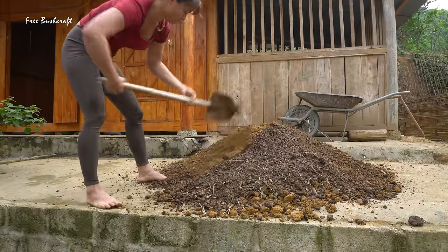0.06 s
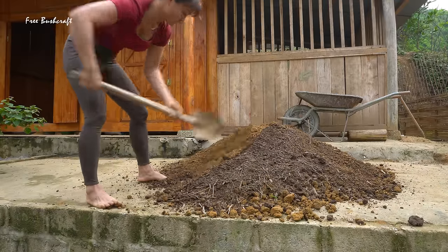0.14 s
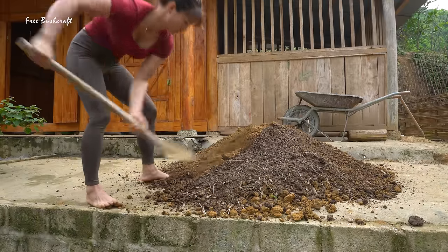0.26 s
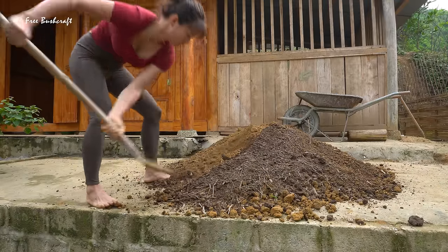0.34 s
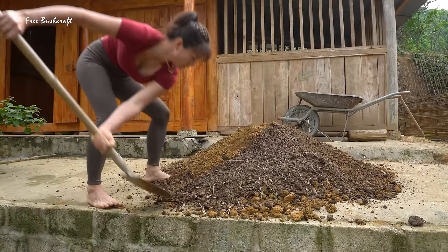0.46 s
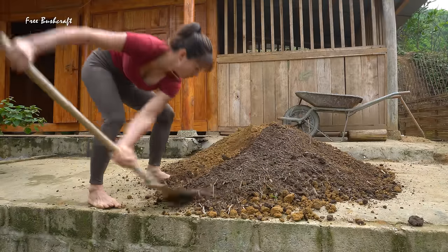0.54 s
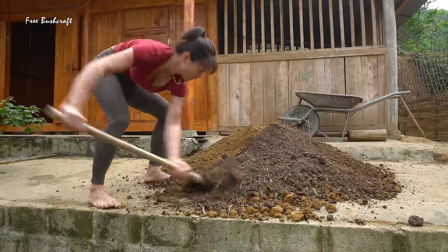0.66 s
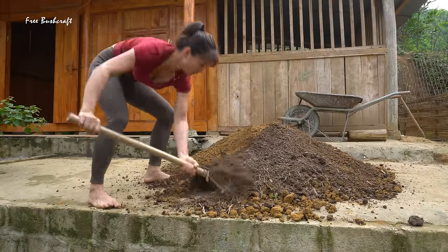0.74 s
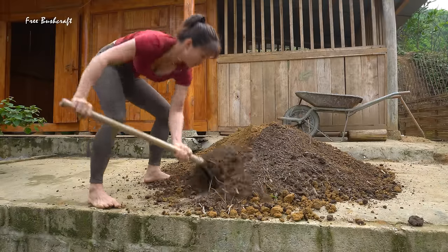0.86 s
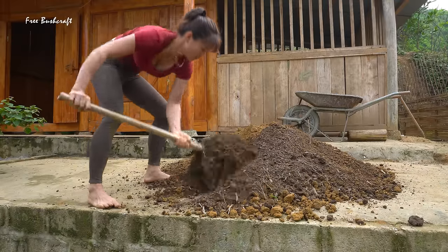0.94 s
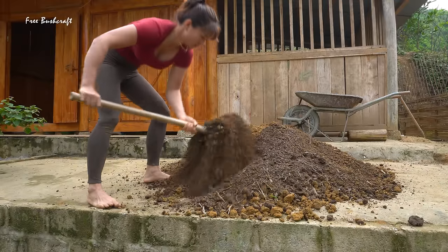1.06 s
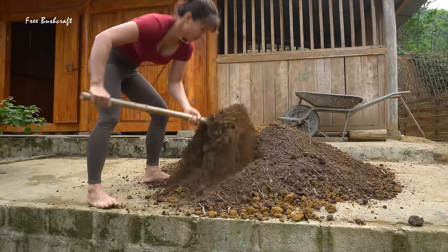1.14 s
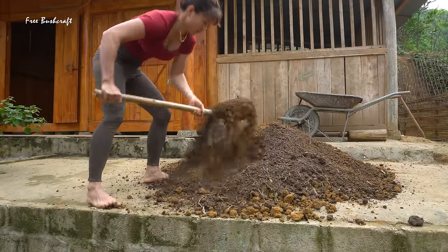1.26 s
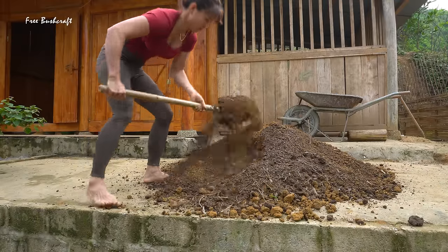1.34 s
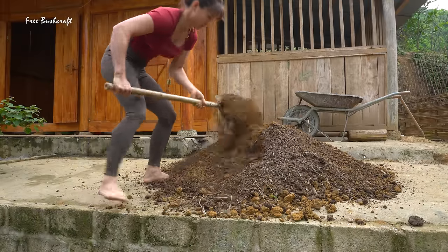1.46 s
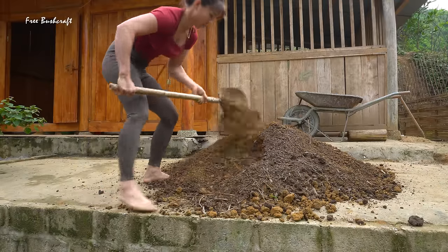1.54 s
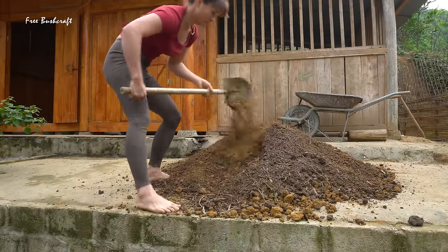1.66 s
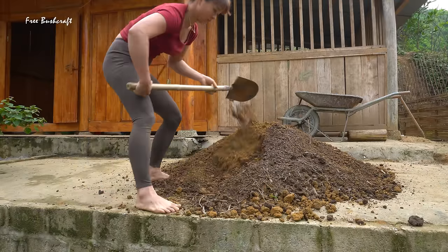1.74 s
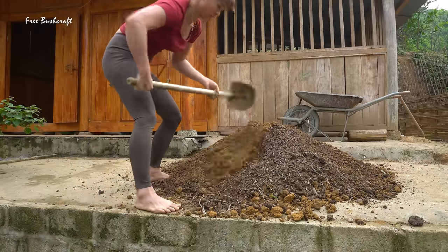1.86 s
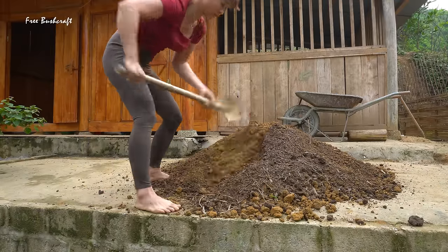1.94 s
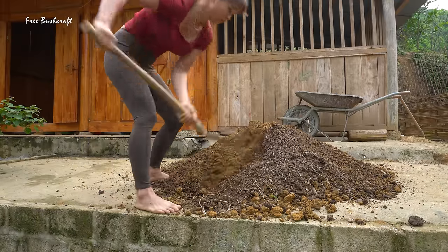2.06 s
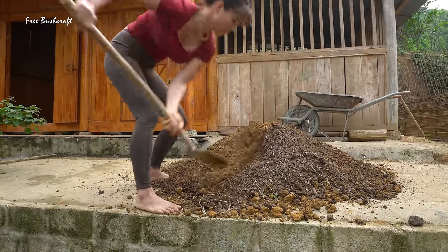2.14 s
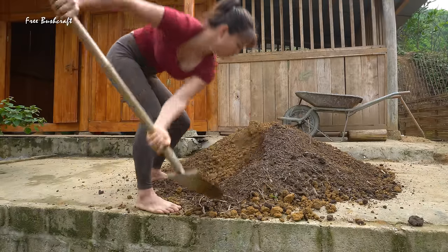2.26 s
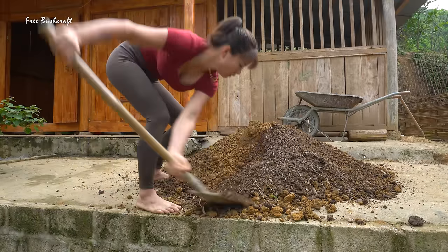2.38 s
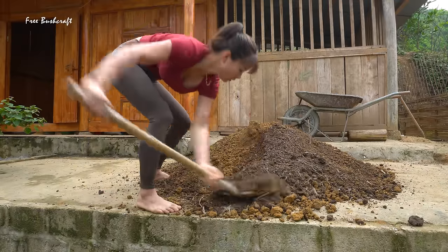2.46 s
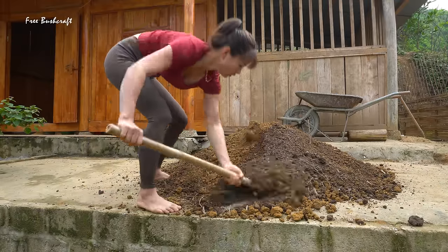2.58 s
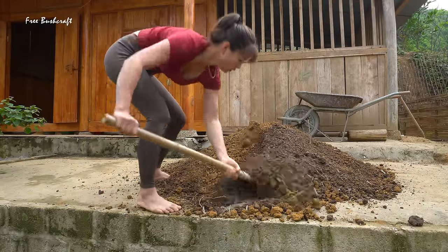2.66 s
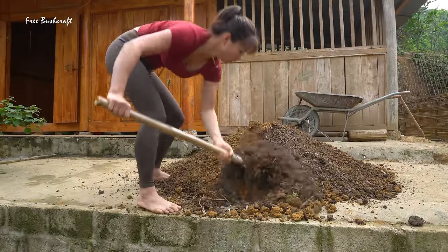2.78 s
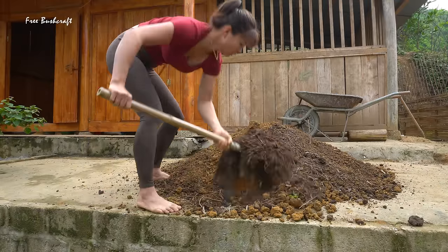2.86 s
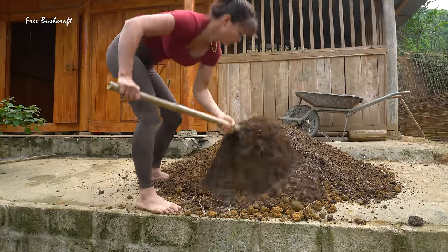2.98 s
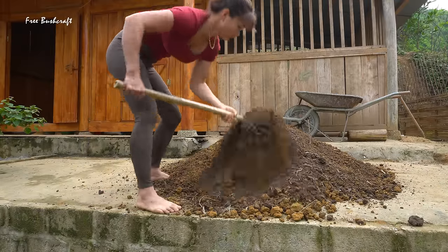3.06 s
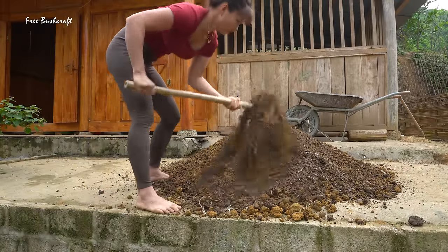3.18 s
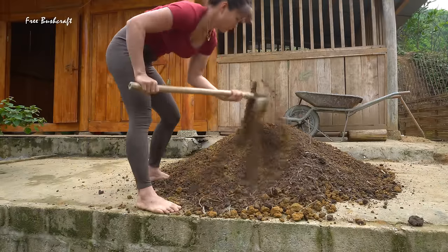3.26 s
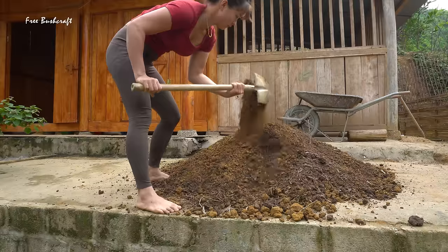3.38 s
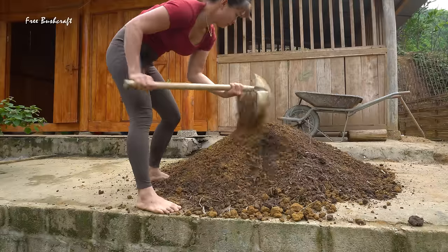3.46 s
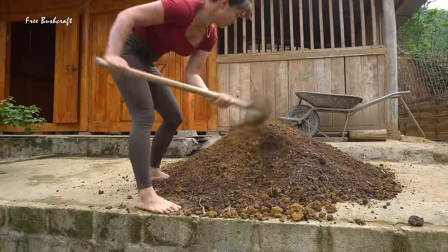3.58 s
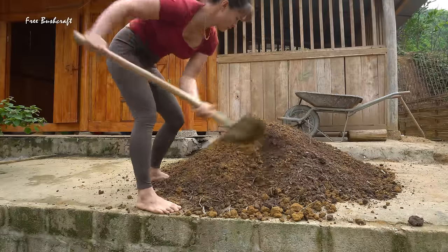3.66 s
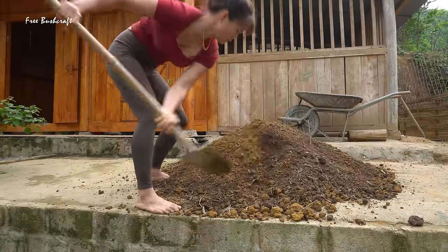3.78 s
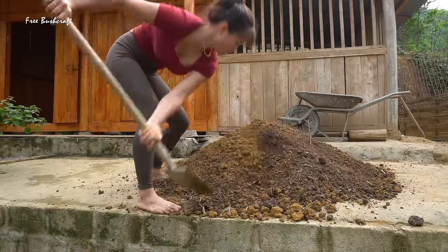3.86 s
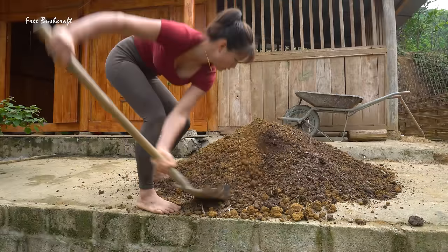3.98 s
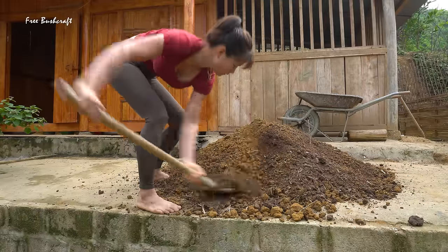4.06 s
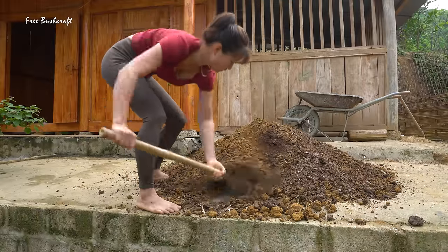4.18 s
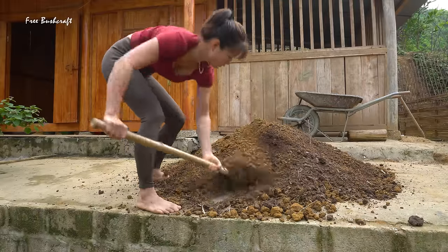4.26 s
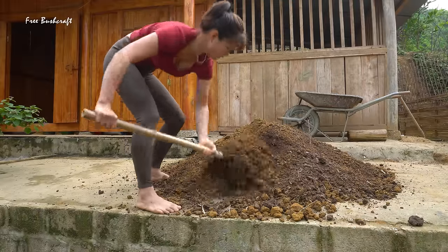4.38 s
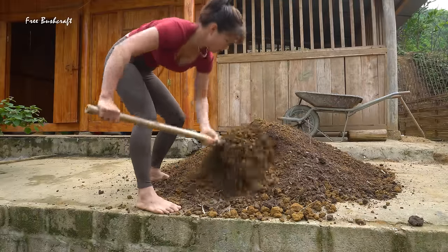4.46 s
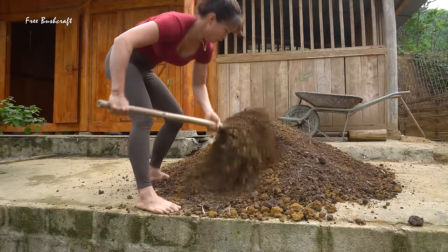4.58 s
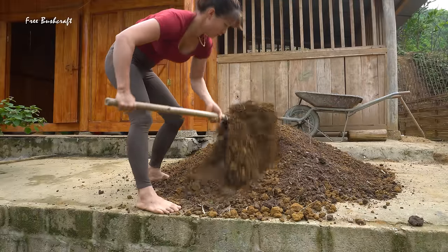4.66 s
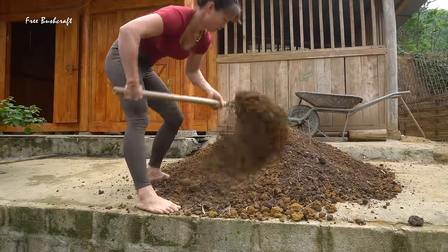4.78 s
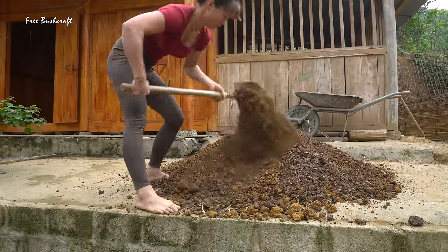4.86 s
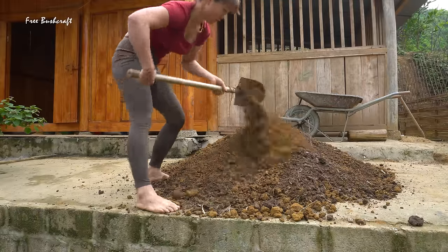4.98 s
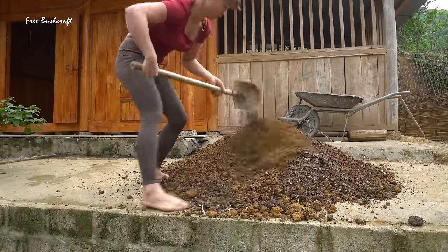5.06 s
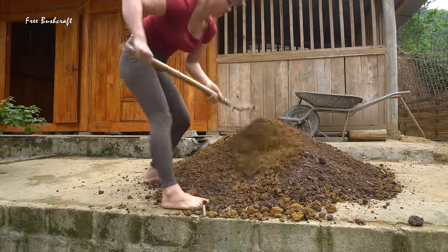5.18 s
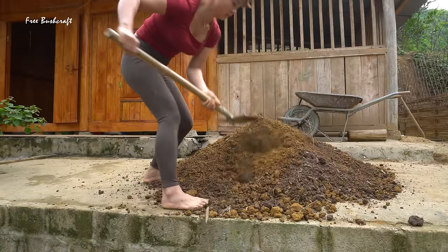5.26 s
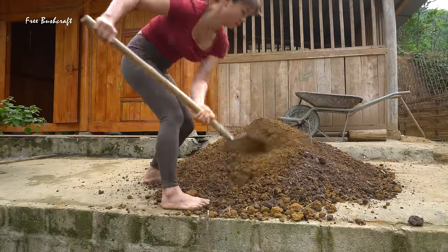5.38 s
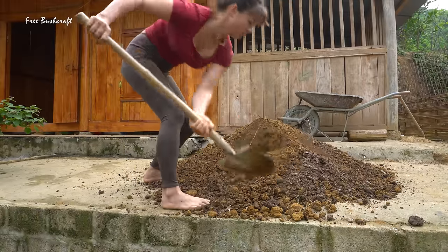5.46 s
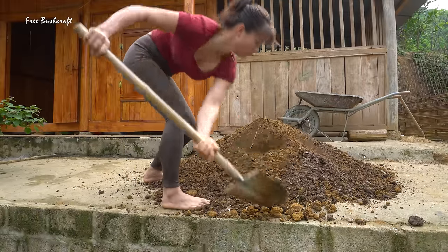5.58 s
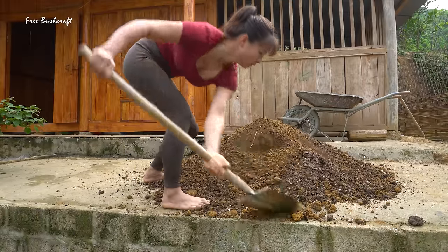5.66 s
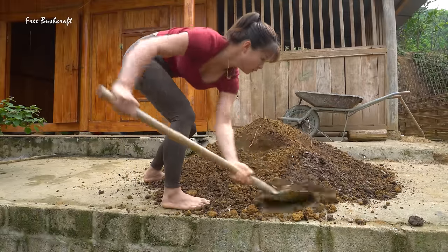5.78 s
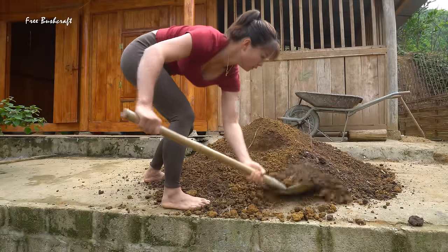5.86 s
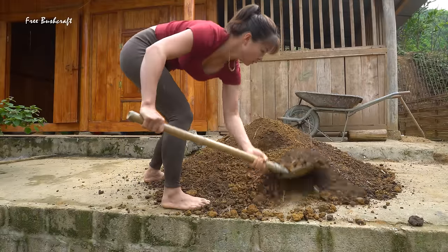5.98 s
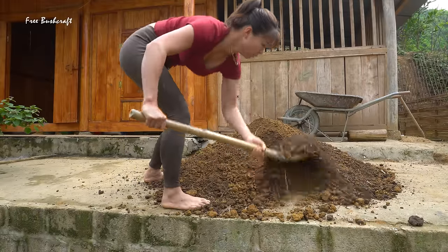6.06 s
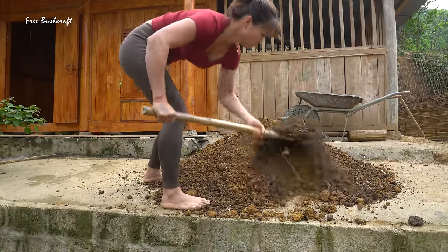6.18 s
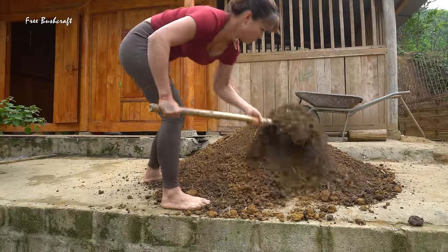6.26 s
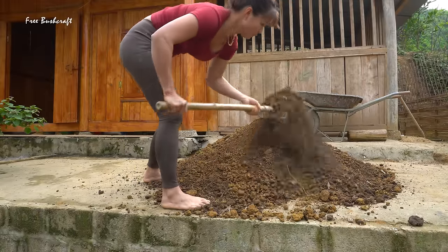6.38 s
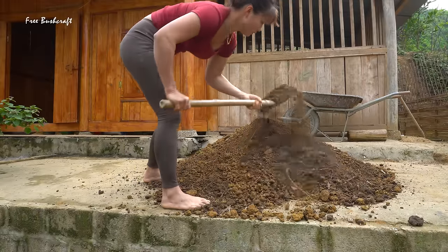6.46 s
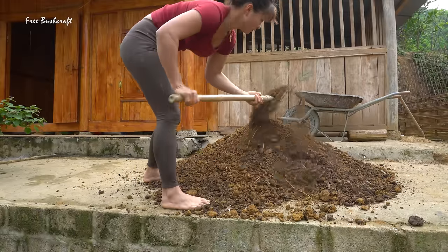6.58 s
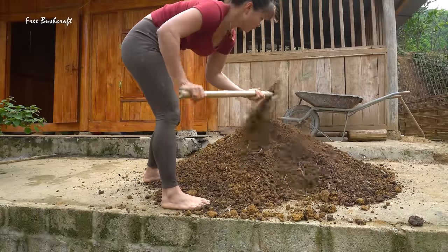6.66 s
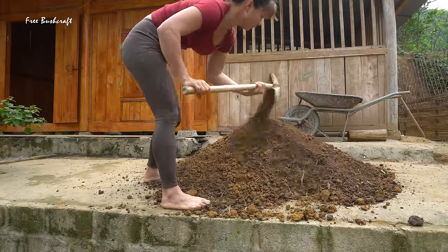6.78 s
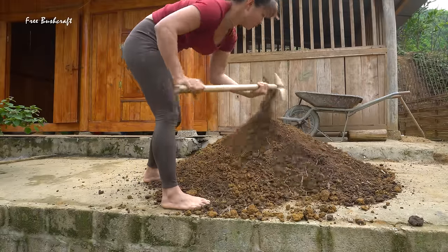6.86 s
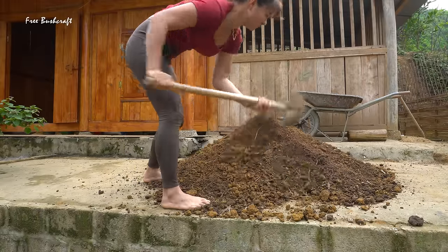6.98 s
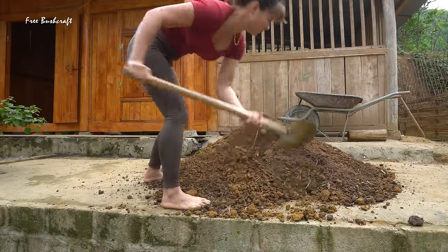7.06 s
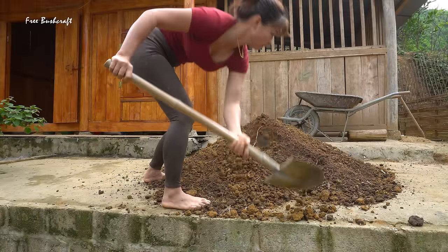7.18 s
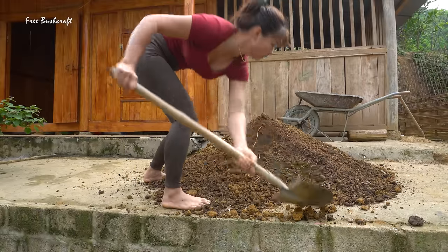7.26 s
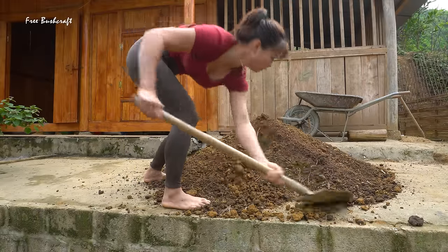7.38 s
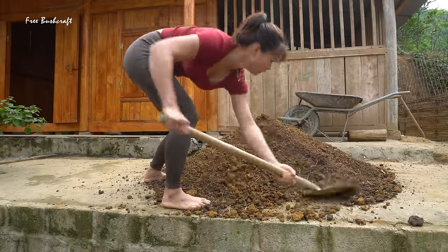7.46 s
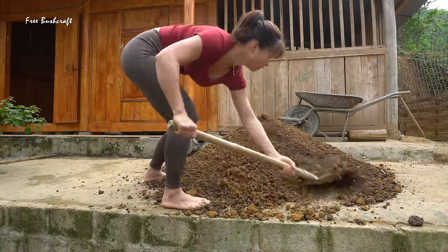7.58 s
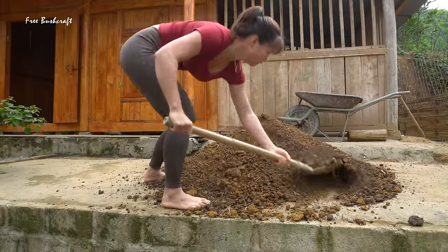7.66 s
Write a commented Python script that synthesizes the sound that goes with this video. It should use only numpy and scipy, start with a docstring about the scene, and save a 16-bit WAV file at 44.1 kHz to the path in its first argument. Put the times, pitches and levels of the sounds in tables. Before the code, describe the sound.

A steel shovel scrapes over concrete five times and tips soil onto a heap, while chicks peep and small birds chirp.

```python
"""A yard by a wooden house front, with a soft outdoor rush and a low hum. A steel shovel is driven five
times over a concrete slab into a soil heap: the edge bites and slips on grit, shaking the blade's modes.
Each tipped load trickles onto the heap, pebbles tick on the ringing blade and soft things thud.
Chicks peep in falling glides between quick twitters, a songbird repeats a wavy whistle, another answers
with short tweets, and a hen clucks faintly. The house front scatters a short echo back."""
import sys
import numpy as np
from scipy import signal
from scipy.fft import rfft, irfft, next_fast_len
from scipy.io import wavfile
from scipy.ndimage import map_coordinates

SR = 44100
rng = np.random.default_rng(int(sys.argv[2]) if len(sys.argv) > 2 else 0)


def unload_audio(sound):
    """Save the sound as a 16-bit wav file, at the path given as the first command line argument."""
    columns = np.transpose(np.atleast_2d(sound))
    # keep every value between -1 and 1, then stretch to whole-number steps
    steps = np.round(np.clip(columns, -1, 1) * 32767)
    wavfile.write(sys.argv[1], SR, steps.astype(np.int16))


N = 340452


def amp(db):
    """Decibels to gain."""
    return 10 ** (np.asarray(db) / 20)


def unit(x):
    """x at rms 1."""
    return x / np.sqrt(np.mean(x ** 2) + 1e-20)


def along(points, hz):
    """Read a curve of (f/Hz, value) points on a log frequency axis."""
    f, values = np.transpose(points)
    return np.interp(np.log(hz + 1), np.log(f + 1), values)


def wobble(rate, size=N):
    """A smooth random modulator, rate knots a second."""
    knots = rng.standard_normal(int(size * rate / SR) + 4)
    return map_coordinates(knots, [np.arange(size) * rate / SR])


def filtered(x, response):
    """x through a complex frequency response."""
    size = x.shape[-1]
    padded = next_fast_len(size + SR // 10)
    return irfft(rfft(x, padded) * response(np.fft.rfftfreq(padded, 1 / SR)), padded)[..., :size]


def add(track, s, sound):
    """Mix a sound into a track at time s."""
    part = track[..., max(round(s * SR), 0):][..., :sound.shape[-1]]
    part += sound[..., :part.shape[-1]]


def panned(x, pan_db):
    """A mono sound as a stereo pair; pan is left level minus right."""
    return np.array([x * amp(pan_db / 2), x * amp(-pan_db / 2)])


def impacts(rate, spread_db, size):
    """Tiny random contacts, rate a second, of scattered sizes."""
    clicks = (rng.random(size) < rate / SR) * np.sign(rng.standard_normal(size))
    return unit(clicks * amp(spread_db * np.clip(rng.standard_normal(size), -2, 2)))


# stereo image of a diffuse field: f/Hz, left-right correlation
CORRELATION = [(60, 1), (180, 0.86), (550, 0.66), (1650, 0.43), (4970, -0.25), (15000, 0.3)]
def diffuse(pair, spectrum):
    """Two unrelated signals as a coloured stereo field, near mono in the bass."""
    def response(hz):
        angle = np.arccos(np.clip(along(CORRELATION, hz), -1, 1)) / 2
        return amp(along(spectrum, hz)) * [np.cos(angle), np.sin(angle)]
    mid, side = filtered(pair, response)
    return unit(np.array([mid + side, mid - side]))


# the microphone ports' own left-right balance: f/Hz, pan/dB
PORT_BALANCE = [(60, -3), (700, 0.5), (2000, 0.5), (3300, 1), (4600, 3.5), (6200, 7), (8300, 2.5),
                (11000, 7), (15000, 6)]
def ports(pair, pan_db):
    """Pan a close sound: the microphone ports tell left from right mainly in the treble."""
    def response(hz):
        pan_share = along([(400, .05), (1500, .39), (5500, 1)], hz)
        tilt = amp((along(PORT_BALANCE, hz) + pan_db * pan_share) / 2)
        return np.array([tilt, 1 / tilt]) * 2 / (tilt + 1 / tilt)
    return filtered(pair, response)


# fader ride of the hum's upper tone: t/s, level/dB
HUM_RIDE = [(.5, -68), (.95, -64.5), (2.1, -62.5), (2.6, -64.5), (3.6, -64.5), (4.3, -67.5), (4.5, -81),
            (5.0, -77), (5.25, -64), (5.6, -62), (5.9, -82), (7.72, -71)]
# EQ of the outdoor rush: f/Hz, level/dB
RUSH_EQ = [(15, -36), (25, -4), (82, -0.5), (473, 0), (557, 4), (812, -3.5), (881, 1), (1390, 1),
           (1510, -4), (1640, 4.5), (1780, 1), (3390, 2.5), (7220, -6.5), (14200, -8.5), (15800, -16.5)]
def yard():
    """The ambience bed: a steady outdoor rush and a two-tone hum, probably a distant motor."""
    hum_db = np.interp(np.arange(N) / SR, *np.transpose(HUM_RIDE))
    hum = amp(hum_db + .88 * wobble(6)) * np.sin(2 * np.pi * np.cumsum(108 + 1.6 * wobble(2.2)) / SR)
    hum += amp(-72) * np.sin(2 * np.pi * np.cumsum(70 + 3 * wobble(24)) / SR)
    rush = amp(-50.5 + .81 * wobble(3.13)) * diffuse(rng.standard_normal((2, N)), RUSH_EQ)
    return hum + rush


# loads tipped onto the heap: t/s, length/s, clod level/dB, crumb level/dB
TIPS = [(-.2, 0.75, -56.5, -55.5), (1.05, 1.71, -54.5, -53.5), (3.149, 0.91, -61.5, -55.5),
        (4.6, .95, -57, -55.5), (6.35, 0.59, -70, -57.5)]
# EQ of tumbling clods: f/Hz, level/dB
CLOD_EQ = [(100, 3), (300, -1), (550, 1.5), (800, 1.5), (1600, 6), (3000, 6), (6000, -49.5)]
# EQ of fine crumbs: f/Hz, level/dB
CRUMB_EQ = [(800, -14), (2000, -3), (4000, -3), (8000, -7), (16000, -10)]
def soil(shove_lead_s=.24, shove_s=.64):
    """Clods tumble and crumbs patter in a swell whenever a load is tipped or a push shoves the heap."""
    t = np.arange(N) / SR
    shoves = [(s - shove_lead_s, shove_s, db - 30.5, db - 28) for s, _, db, *_ in PUSHES]
    clod_gain, crumb_gain = sum(
        amp([[clod_db], [crumb_db]]) * np.sin(np.pi * np.clip((t - s) / length, 0, 1))
        for s, length, clod_db, crumb_db in TIPS + shoves)
    patter = lambda rate, spread_db: np.array([impacts(rate, spread_db, N) for _ in range(2)])
    clods = clod_gain * amp(3.1 * wobble(35)) * diffuse(patter(900, 3.9), CLOD_EQ)
    crumbs = crumb_gain * amp(3.8 * wobble(45)) * diffuse(patter(1100, 4.9), CRUMB_EQ)
    return clods + crumbs


def clod_taps(per_second=22, above_clods_db=11, t60=.039, centre_hz=1150):
    """Up to 30 single small clods break away from each tipped load and tap on the heap."""
    out, t = np.zeros((2, N)), np.arange(SR // 12) / SR
    attack = 1 - np.exp(-t / .0021)
    for s, length, clod_db, _ in TIPS:
        for when, pitch, size in rng.standard_normal((30, 3))[:int(per_second * length)]:
            hz = centre_hz * np.exp(.55 * np.clip(pitch, -2, 2))
            tone = np.sin(2 * np.pi * hz * t + .53 * wobble(410, len(t)))
            decay = amp(clod_db + above_clods_db + 3.6 * min(size, 1.5) - 60 * t / t60)
            add(out, s + length * np.clip(.5 + when / 4, 0, 1), attack * decay * tone)
    return out


# pebble hits: t/s, level/dB, ring against crunch/dB, crunch t60/s
TICKS = [(.155, -42.5, -10, .06), (0.202, -38.5, -4, 0.048), (0.2553, -42.5, 3, .03),
         (1.2072, -44, -26, 0.02), (2.648, -29, -9.5, 0.024), (3.3885, -46.5, -3, 0.023),
         (4.8267, -39.5, -17, 0.072), (5.1514, -34, -4.5, 0.068), (5.7084, -40.5, -10, .06),
         (5.9378, -16.5, -19, .019), (5.9705, -21, -24, 0.031), (6.8246, -36.5, -17, 0.048),
         (7.371, -33, -22, 0.077), (7.3976, -39, -8, 0.049)]
# EQ of crunching grit: f/Hz, level/dB
GRIT_EQ = [(60, -53), (150, -25), (250, -4), (370, -19.5), (500, -4.5), (620, -2.5), (800, -3), (1000, -9),
           (1400, 0), (2000, 0.5), (3500, 3.5), (5000, -4), (12000, -4.5), (16000, -10.5)]
# modes of the blade ringing free of the ground: f/Hz, level/dB, t60/s
FREE_MODES = [(994, -16.5, 0.46), (1573, -0.5, 0.19), (2010, 2.5, 0.13), (2550, -5.5, 0.1),
              (2970, -6.5, 0.078), (4780, -15, .05)]
def pebble_ticks(stray_db=-46.5, stray_ring_db=-5.5, stray_t60=.023):
    """Pebbles crunch on the lifted blade and set it ringing; two faint strays fall with each load."""
    out, size = np.zeros(N), SR // 4
    t = np.arange(size) / SR
    strays = [(max(s + length * when, 0), stray_db, stray_ring_db, stray_t60)
              for s, length, *_ in TIPS for when in rng.random(size=2)]
    for s, db, ring_db, crunch_t60 in TICKS + strays:
        grit = filtered(impacts(14000, 2.6, size), lambda hz: amp(along(GRIT_EQ, hz)))
        crunch = unit(grit) * amp(-60 * t / crunch_t60)
        ring = sum(amp(level + rng.normal(0, 3.2) - 60 * t / t60)
                   * np.sin(2 * np.pi * hz * t + .5 * wobble(135, size))
                   for hz, level, t60 in FREE_MODES)
        add(out, s, amp(db) * (crunch + amp(ring_db) * ring))
    return ports(np.array([out, out]), pan_db=1)


def bird_note(contour, octave, waver, flutter_db):
    """A tone and its octave glide along (t/s, f/Hz, level/dB) points, roughening towards the end."""
    s, hz, db = np.transpose(contour)
    t = np.arange(int(s[-1] * SR)) / SR
    pitch = map_coordinates(hz, [np.interp(t, s, np.arange(len(s)))], mode="nearest")
    jitter = waver * (.084 + (t / t[-1]) ** 2) * wobble(900, len(t))
    phase = 2 * np.pi * np.cumsum(pitch * (1 + jitter)) / SR
    fade = np.clip(np.minimum(t, t[-1] - t) / .00075, 0, 1)
    gain = amp(np.interp(t, s, db) + flutter_db * wobble(183, len(t)))
    return fade * gain * (np.sin(phase) + amp(along(octave, pitch)) * np.sin(2 * phase))


# peep cues: t/s, length/s, start f/Hz, level/dB
PEEPS = [(0.245, .16, 4990, -36), (1.35, .16, 4800, -40), (1.742, 0.14, 4980, -37), (2.261, .13, 4950, -38),
         (2.938, 0.13, 4700, -40.5), (3.486, .14, 5000, -39.5), (3.774, 0.13, 5240, -34),
         (5.052, 0.16, 4110, -34.5), (5.896, .1, 3555, -36), (6.029, .11, 4600, -45.5),
         (6.446, .13, 4590, -40), (7.663, .11, 4230, -34.5)]
# a peep's lower voice: share of the length, share of the fall when hoarse, level/dB
LOWER_VOICE = [(0, .1, -18), (0.451, .44, -18.5), (.6, .55, -3.5), (0.759, .66, -2.5), (.89, .9, -2),
               (1, 1, -3)]
# its thin upper voice: t/s from the onset, f/Hz, level/dB
UPPER_VOICE = [(0, 4950, -20.5), (.055, 4600, -13), (.11, 4150, -17.5)]
# a peep's octave: fundamental f/Hz, level against the fundamental/dB
PEEP_OCTAVE = [(2500, -28), (3000, -16), (3600, -23), (4400, -12), (5000, -11.5)]
def chicks(pan_db=8.5):
    """Each peep starts thin, in two voices, and falls; a strained one breaks into a hoarse lower note."""
    out = np.zeros((2, N))
    for s, length, start_hz, db in PEEPS:
        strain = np.interp(start_hz, [4200, 4800], [0, 1])  # the higher the start, the more strained
        fall_hz = np.interp(strain, [0, 1], [2680, 2426]) - start_hz
        waver = np.interp(strain, [0, 1], [.018, .062])
        contour = [(u * length, start_hz + (u + strain * (fall - u)) * fall_hz, level)
                   for u, fall, level in LOWER_VOICE]  # a clear voice glides straight
        lower = bird_note(contour, PEEP_OCTAVE, waver, flutter_db=3)
        upper = bird_note(UPPER_VOICE, PEEP_OCTAVE, waver=.024, flutter_db=5.5)
        add(out, s, panned(amp(db) * lower, pan_db))
        add(out, s, panned(amp(db - 4.5 * (1.5 - strain)) * upper, pan_db))
    return out


# twitter cues: t/s, level/dB
TWITTERS = [(.358, -44), (.488, -43), (3.764, -40.5), (4.785, -46), (6.378, -41.5)]
# one rising chirp: t/s from the onset, f/Hz, level/dB
TWITTER_CONTOUR = [(0, 4590, -7.5), (.014, 5800, -4), (.028, 6600, -2)]
def twitters(spacing_s=.027, accents_db=(-2, 2, -10), pan_db=-1.8):
    """The chicks twitter in bursts of three quick rising chirps."""
    out = np.zeros((2, N))
    for s, db in TWITTERS:
        for k, accent_db in enumerate(accents_db):
            chirp = bird_note(TWITTER_CONTOUR, [(5000, -16)], waver=.092, flutter_db=1)
            add(out, s + k * spacing_s, panned(amp(db + accent_db) * chirp, pan_db))
    return out


# modes of the blade pressed on the slab: nominal f/Hz, nominal width/Hz, level/dB
PRESSED_MODES = [(283, 87, -3), (458, 20, -7.5), (515, 37, -4), (760, 93, -18), (956, 52, 1),
                 (1049, 13, 6.5), (1176, 17, 1), (1525, 220, 6), (1670, 69, 10.5), (1926, 125, 9),
                 (1977, 25, 6), (2087, 135, 2), (2115, 44, 5.5), (2430, 82, 0.5), (2770, 63, 7),
                 (2960, 15, 7.5), (2900, 38, -9), (3250, 85, 6), (4080, 30, -4), (4650, 52, 0),
                 (5700, 120, -6), (6640, 52, -1), (7080, 50, -4), (7900, 340, -11), (9300, 67, -3),
                 (10700, 320, -6)]
def pressed_blade(hz, stiffness, damping=.73, min_width_hz=45, scatter_db=3):
    """The blade's frequency response; soil damps it, and each contact point favours other modes."""
    response = 0
    for mode_hz, width_hz, db in PRESSED_MODES:
        loss = 1j * hz * max(width_hz * damping, min_width_hz)
        gain = amp(db + scatter_db * rng.standard_normal())
        response += gain * loss / ((mode_hz * stiffness) ** 2 - hz ** 2 + loss)
    return response


def bite(length, db, load_db, grit_db, stiffness, bass_hz, treble_hz, release_s=.0018):
    """The edge grips and chatters over sand grains, which crackle and shake the blade."""
    size = 8192
    t, hz = np.arange(size) / SR, np.fft.rfftfreq(size, 1 / SR)
    grip = np.clip(t / .0009, 0, 1) * np.exp(-np.maximum(t - length, 0) / release_s)
    chatter = amp(1.5 * wobble(332.6, size))
    colour = np.hypot(abs(pressed_blade(hz, stiffness)), amp(1 + along(GRIT_EQ, hz)))
    colour *= amp(3 * wobble(1302.5, len(hz)))  # countless higher modes ripple each contact anew
    colour *= hz ** 2 / (bass_hz ** 2 + hz ** 2) / np.sqrt(1 + (hz / treble_hz) ** 4)
    # the load drives the low modes, the edge the middle ones, crushed grit the treble
    low, high = 1 / (1 + (hz / 1200) ** 8), 1 / (1 + (4500 / (hz + 1)) ** 8)
    colour = (amp(load_db) * unit(colour * low) + unit(colour * (1 - low - high))
              + amp(grit_db) * unit(colour * high))
    # minimum phase, so the ring follows each grain
    cepstrum = irfft(np.log(np.maximum(colour, 1e-3)))
    response = np.exp(rfft(np.r_[cepstrum[0], 2 * cepstrum[1:size // 2]], size))

    def grain_spectrum(rate, spread_db):
        grains = impacts(rate, spread_db, size) * chatter * grip
        return rfft(grains * np.sqrt(np.sum(grip ** 2) / (np.sum(grains ** 2) + 1e-9)))
    direct = irfft(grain_spectrum(7000, 3.9) * response)
    width = amp(-6.5) * along([(900, .031), (3500, .55)], hz)  # flying grit widens the treble
    spray = irfft(grain_spectrum(9000, 2.8) * response * width)
    return amp(db) * np.array([direct + spray, direct - spray])


def squeal(length, pitch_hz, db):
    """One mode sings unsteadily while the edge sticks."""
    size = int(length * SR)
    swell = np.sin(np.pi * np.arange(size) / size) * unit(amp(2 * wobble(220, size)))
    pitch = pitch_hz * (1 + .036 * wobble(403, size))
    return amp(db) * swell * np.sin(2 * np.pi * np.cumsum(pitch) / SR)


GRAZE_S, SETTLE_S, LIFT_S = .01, .034, .012
# the edge skips and loses grip: t/s, length/s, dip/dB
SKIPS = [(.668, .04, -2), (2.57, 0.0081, -4), (4.054, 0.047, -3), (4.123, 0.021, -9), (7.537, .018, -2.5)]
# it catches on a stone: t/s, length/s, level/dB
CATCHES = [(2.578, .0074, -16), (2.593, .027, -20.5), (4.162, .015, -22.5), (5.913, 0.011, -20),
           (5.945, 0.044, -35.5), (7.556, .013, -22.5), (7.574, 0.0069, -20.5)]
# it sticks and squeals: t/s, length/s, f/Hz, level/dB
SQUEALS = [(.641, 0.092, 990, -27.5), (0.711, 0.034, 1930, -21), (2.461, .039, 950, -24.5),
           (2.526, 0.03, 3400, -21), (2.606, 0.014, 2470, -16), (4.028, .03, 541, -25),
           (5.767, .14, 4700, -24.5), (5.781, 0.13, 2940, -22.5), (7.449, 0.024, 2066, -16),
           (7.489, 0.027, 1680, -16)]
def scrape(start, length, db, graze_db, landing_db, load_db, grit_db, pan_db, *blade, bites=6):
    """One push: the edge grazes, lands, bites and slips under a swelling load, then drags as it lifts."""
    out, onset = np.zeros((2, SR // 2)), start - GRAZE_S
    add(out, 0, bite(GRAZE_S, db + graze_db, load_db, grit_db, *blade))
    slips = np.arange(1, bites) + np.clip(.2 * rng.standard_normal(bites - 1), -.5, .5)
    edges = length * np.r_[0, slips, bites] / bites
    for begin, end in zip(edges, edges[1:]):
        middle = (begin + end) / 2
        bite_db = db + landing_db * max(1 - middle / SETTLE_S, 0) + .96 * rng.standard_normal()
        weight_db = load_db + 1.5 * (np.sin(np.pi * middle / length) - 1)  # heaviest in mid-push
        add(out, GRAZE_S + begin, bite(end - begin, bite_db, weight_db, grit_db, *blade))
    t = onset + np.arange(out.shape[1]) / SR
    out *= amp(sum(dip_db * np.sin(np.pi * np.clip((t - s) / held, 0, 1)) for s, held, dip_db in SKIPS))
    add(out, GRAZE_S + length, bite(LIFT_S, db - 11, load_db, grit_db - 2, *blade, release_s=.026))
    for s, held, catch_db in CATCHES:
        if 0 <= s - onset < .5:
            add(out, s - onset, bite(held, catch_db, -13.5, grit_db - 6, *blade))  # mostly middle modes
    for s, *tone in SQUEALS:
        if 0 <= s - onset < .5:
            add(out, s - onset, squeal(*tone))
    return ports(out, pan_db)


# push cues: t/s, length/s, level/dB, graze trim/dB, landing trim/dB, load trim/dB, grit trim/dB,
# pan/dB, stiffness (factor on the mode frequencies), low cut/Hz, high cut/Hz
PUSHES = [(0.6, .16, -22.5, -10, -9, -6.5, 0.9, 1.5, 0.98, 280, 17000),
          (2.445, .13, -22, -16, -0.5, -4.5, 1, -2, 0.98, 270, 14900),
          (4.036, .141, -23.5, -11, 1, -4, 2.5, 0, 1.0, 240, 21000),
          (5.761, .143, -23, -20, 3, -9, 0.1, -5, 0.98, 385, 19000),
          (7.429, 0.12, -22, -25, 2, -12.5, -1, -6.5, 0.99, 212, 11700)]
def shovel():
    """The steel blade is pushed five times over the concrete slab."""
    out = np.zeros((2, N))
    for start, *push in PUSHES:
        add(out, start - GRAZE_S, scrape(start, *push))
    return out


# whistle cues: t/s, level/dB
WHISTLES = [(.966, -38.5), (1.408, -33), (1.842, -30), (2.279, -29), (2.722, -34.5), (3.164, -34),
            (3.606, -33), (6.342, -40), (6.784, -34.5), (7.216, -32), (7.655, -34.5)]
# one wavy, falling whistle: t/s from the onset, f/Hz, level/dB
WHISTLE_CONTOUR = [(0, 6190, -14.5), (.012, 6820, -13), (.026, 6206, -5.5), (.041, 5680, -7.5),
                   (.058, 6454, -2.5), (.073, 5974, -8.5), (.09, 5200, -8.5), (.105, 4380, -6),
                   (.128, 3770, -7), (.146, 3220, -30)]
# tweet cues: t/s, level/dB
TWEETS = [(1.226, -37), (1.660, -34.5), (2.095, -32.5), (3.420, -36), (3.88, -39.5), (6.600, -37),
          (7.031, -36)]
# one short tweet: t/s from the onset, f/Hz, level/dB
TWEET_CONTOUR = [(0, 3550, -8), (.008, 4540, -11.5), (.014, 3630, -3), (0.024, 3583, -8),
                 (.038, 3166, -19.5), (0.047, 3317, -4.5), (.057, 3600, -2.5), (0.065, 3280, -5.5),
                 (0.074, 2720, -24)]
def songbirds(pan_db=-6.5):
    """Two small birds trade nearly pure notes: one whistles, the other tweets back."""
    out = np.zeros((2, N))
    for cues, contour, waver in ((WHISTLES, WHISTLE_CONTOUR, .008), (TWEETS, TWEET_CONTOUR, .03)):
        for s, db in cues:
            call = bird_note(contour, [(5000, -56)], waver, flutter_db=1.5)
            add(out, s, panned(amp(db) * call, pan_db))
    return out


def dull_tone(db, pitch_hz, t60, rough, attack_s=.0052):
    """A soft, low, slightly rough note that dies away."""
    t = np.arange(SR // 4) / SR
    envelope = amp(db - 60 * t / t60) * (1 - np.exp(-t / attack_s))
    return envelope * np.sin(2 * np.pi * pitch_hz * t + rough * wobble(289, len(t)))


# cluck cues: t/s, level/dB
CLUCKS = [(1.575, -42.5), (5.254, -40.5), (6.025, -39), (6.50, -43.5), (6.622, -40.5)]
def hen():
    """Short soft clucks, all on one pitch."""
    out = np.zeros((2, N))
    for s, db in CLUCKS:
        add(out, s, dull_tone(db, pitch_hz=577, t60=.12, rough=.38))
    return out


# thud cues: t/s, level/dB, f/Hz
THUDS = [(1.946, -37, 753), (2.131, -33.5, 557), (2.186, -23.5, 675), (2.187, -31, 1035),
         (2.211, -20.5, 316), (2.211, -25, 723), (2.647, -27, 685)]
def thuds():
    """Soft things thud: dull, quickly damped knocks."""
    out = np.zeros(N)
    for s, db, pitch_hz in THUDS:
        add(out, s, dull_tone(db, pitch_hz, t60=.058, rough=1))
    return ports(np.array([out, out]), pan_db=1)


# decay of the echo: f/Hz, t60/s
ECHO_DECAY = [(200, 0.53), (2000, 0.21), (6000, 0.34), (14000, 0.15)]
def house_echo(x, predelay_s):
    """The wooden house front scatters sound back; the bass rings longest."""
    hz, t, noise = signal.stft(rng.standard_normal((2, SR // 2)), SR, nperseg=256)
    tail = signal.istft(noise * amp(-60 * t / along(ECHO_DECAY, hz)[:, None]), SR, nperseg=256)[1]
    tail = diffuse(tail, [(100, 0), (16000, 0)]) / np.sqrt(tail.shape[1])
    delayed = np.pad(x, ((0, 0), (int(predelay_s * SR), 0)))
    return signal.fftconvolve(delayed, tail, axes=1)[:, :N]


def scene():
    """The mix: the near shovel is almost dry; the birds are farther off, with more echo."""
    digging = shovel() + pebble_ticks() + thuds()
    song = songbirds()
    peeps = chicks() + twitters()
    echoes = (amp(-17) * house_echo(digging, .012) + amp(-6) * house_echo(song, .012)
              + amp(-.3) * house_echo(peeps, .0045))
    return digging + song + peeps + echoes + soil() + clod_taps() + hen() + yard()


CEILING, TOP_HZ = .75, 16050
def record(dry):
    """The master: a soft clip rounds the highest peaks and a brick-wall low-pass trims the top."""
    rounded = dry / (1 + (dry / CEILING) ** 4) ** .25
    return filtered(rounded, lambda hz: hz < TOP_HZ)


dry = scene()
out = record(dry)
unload_audio(out)
```